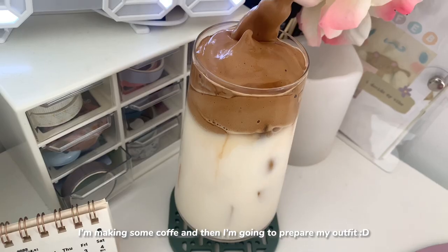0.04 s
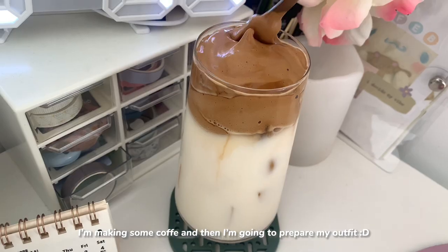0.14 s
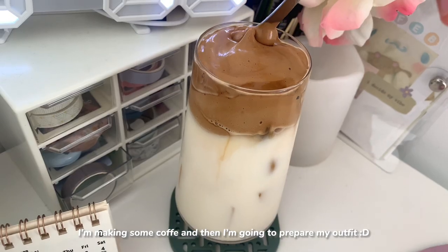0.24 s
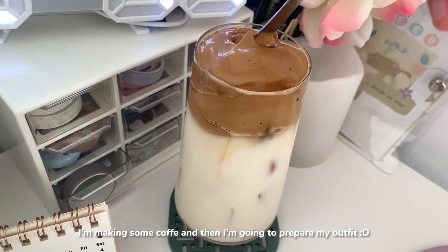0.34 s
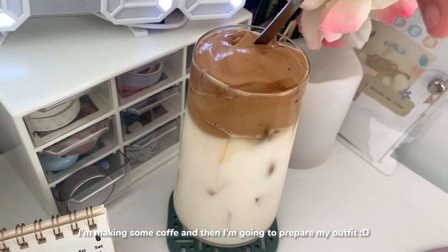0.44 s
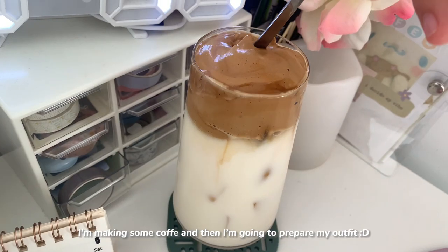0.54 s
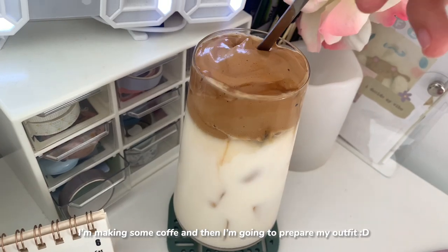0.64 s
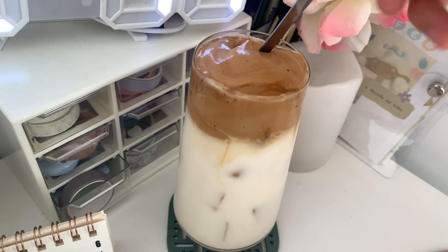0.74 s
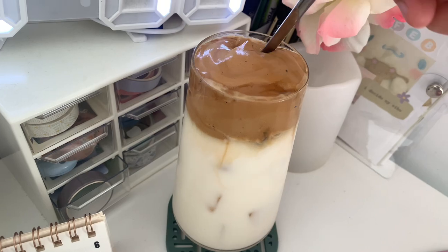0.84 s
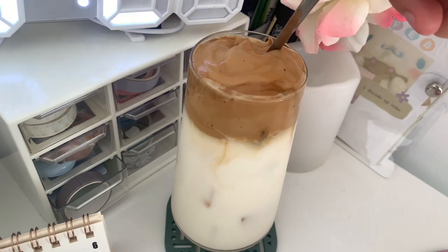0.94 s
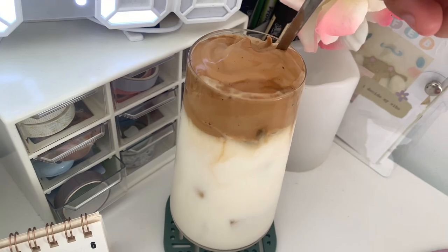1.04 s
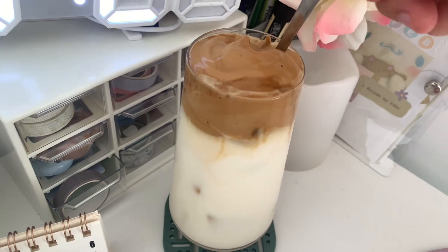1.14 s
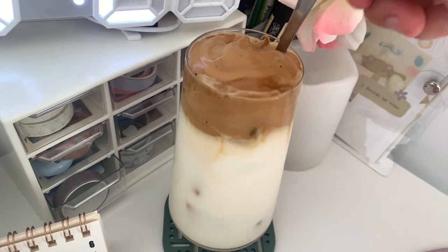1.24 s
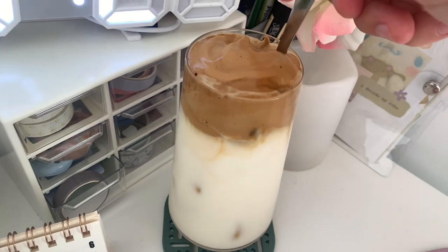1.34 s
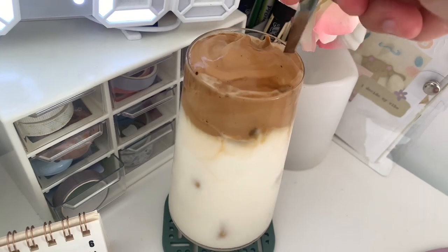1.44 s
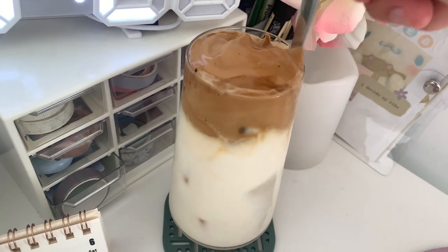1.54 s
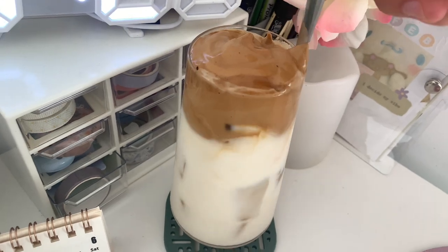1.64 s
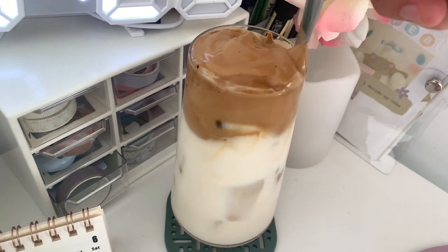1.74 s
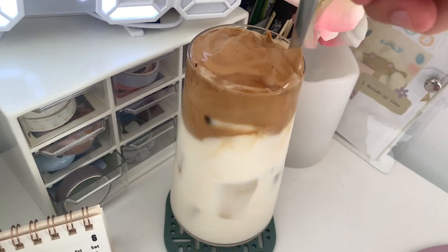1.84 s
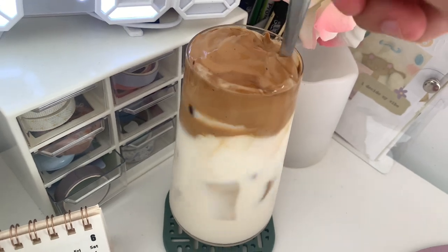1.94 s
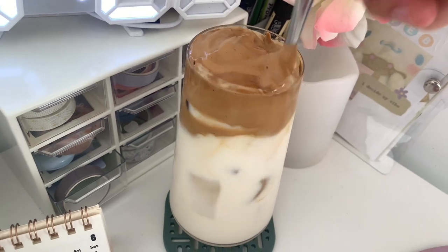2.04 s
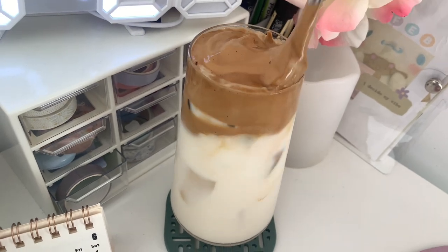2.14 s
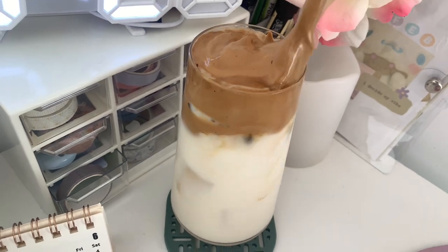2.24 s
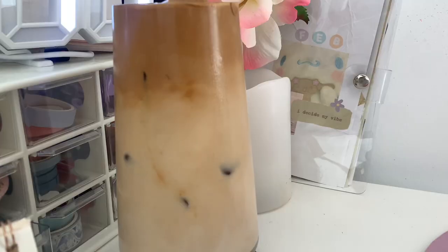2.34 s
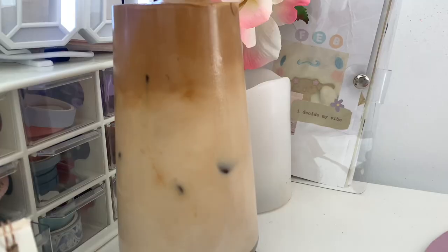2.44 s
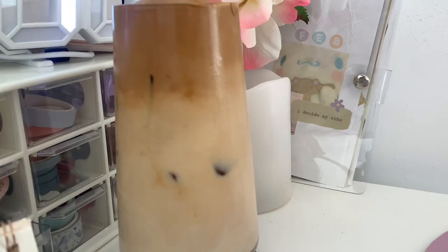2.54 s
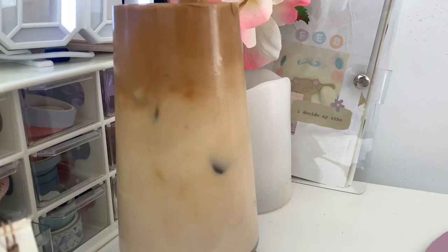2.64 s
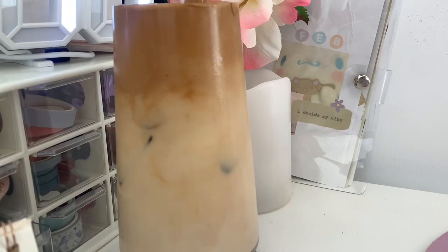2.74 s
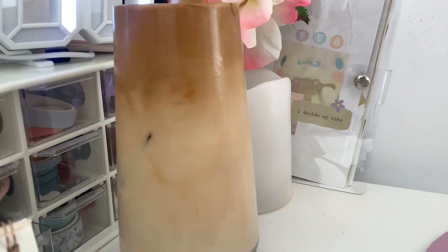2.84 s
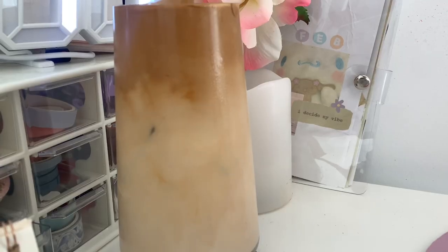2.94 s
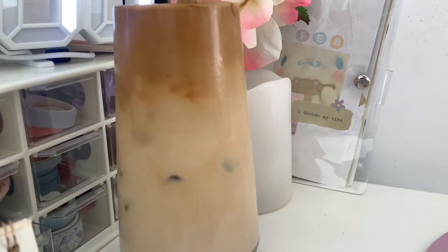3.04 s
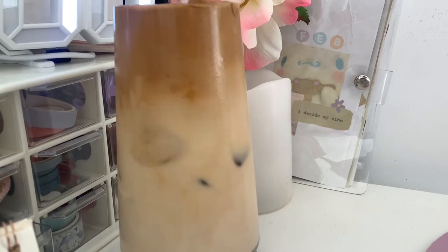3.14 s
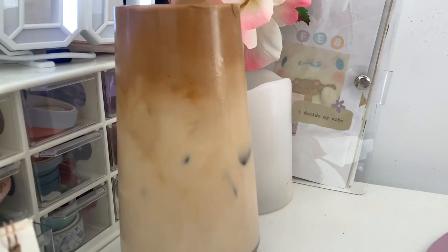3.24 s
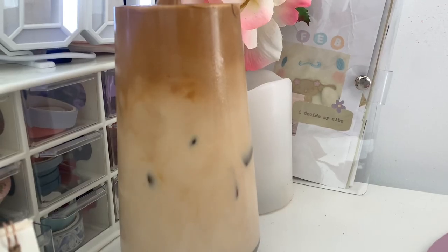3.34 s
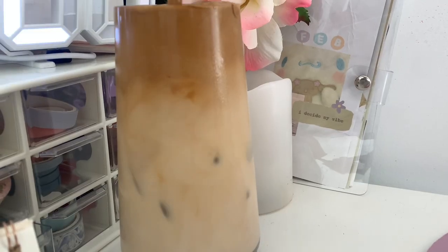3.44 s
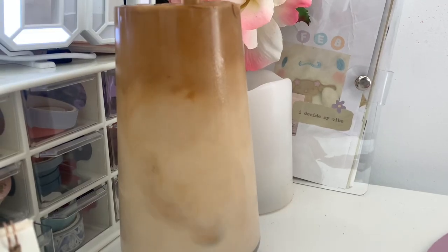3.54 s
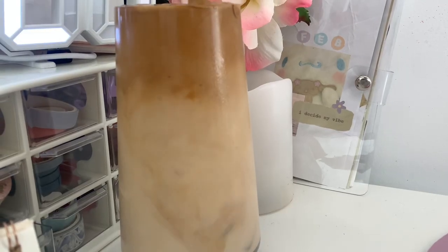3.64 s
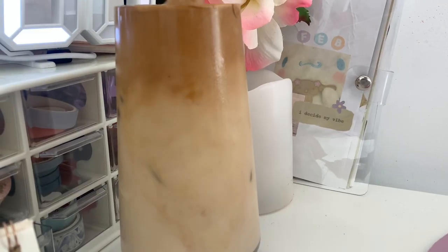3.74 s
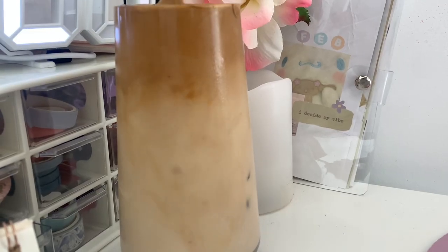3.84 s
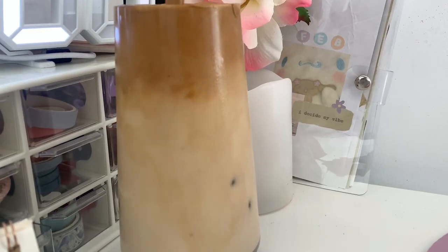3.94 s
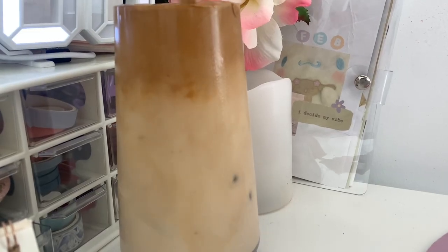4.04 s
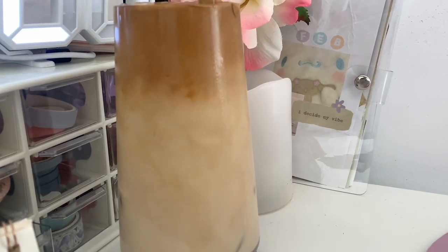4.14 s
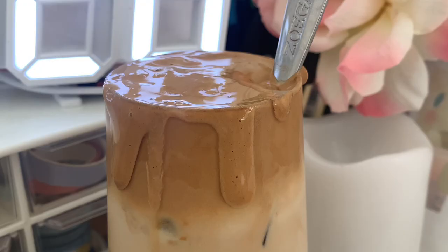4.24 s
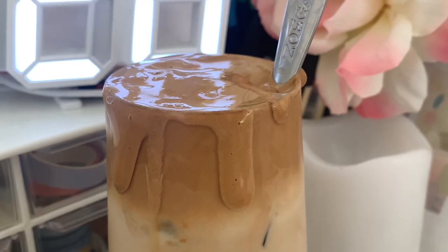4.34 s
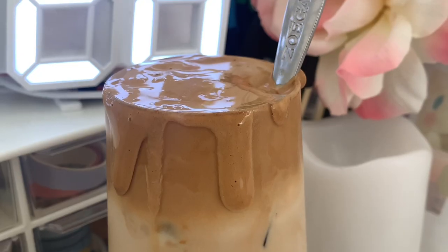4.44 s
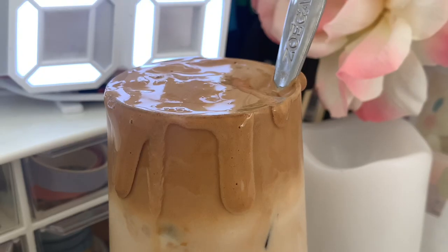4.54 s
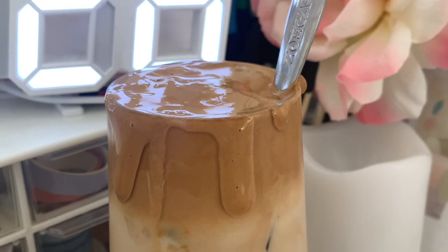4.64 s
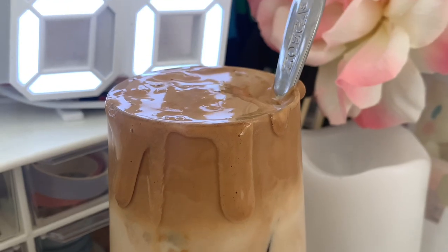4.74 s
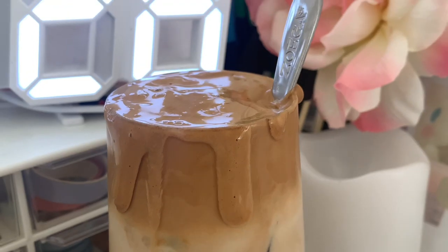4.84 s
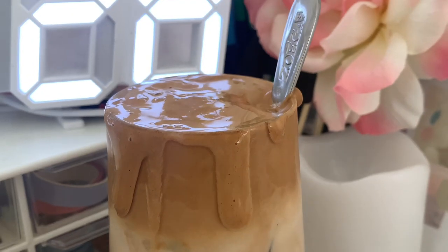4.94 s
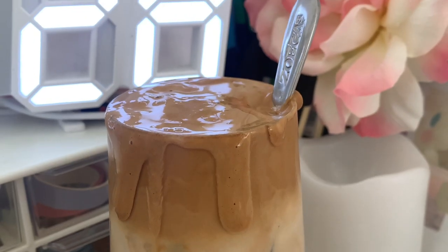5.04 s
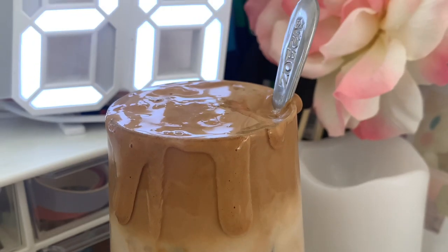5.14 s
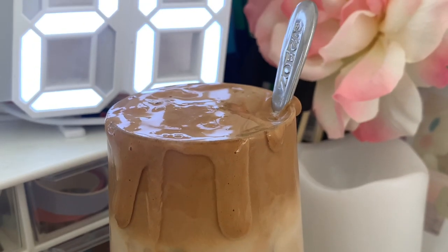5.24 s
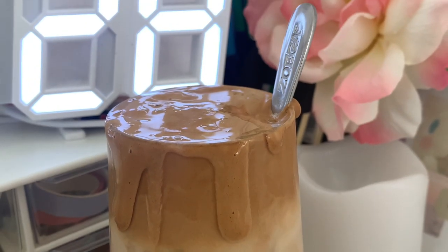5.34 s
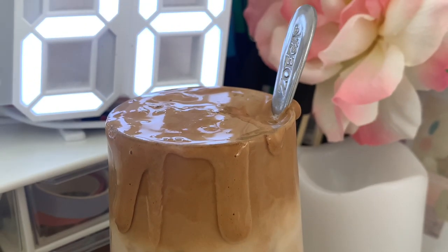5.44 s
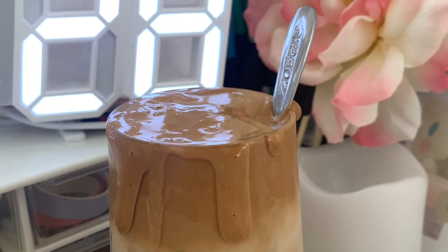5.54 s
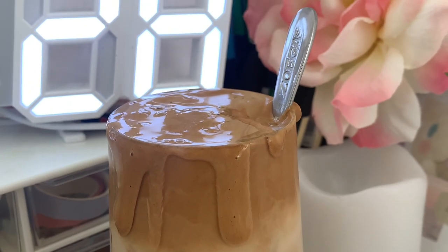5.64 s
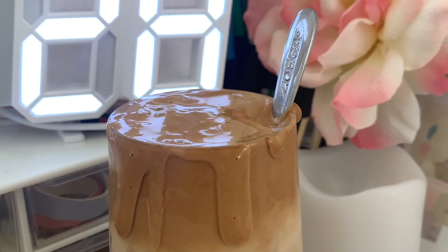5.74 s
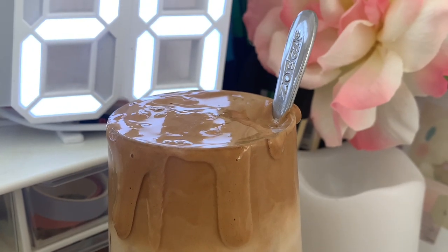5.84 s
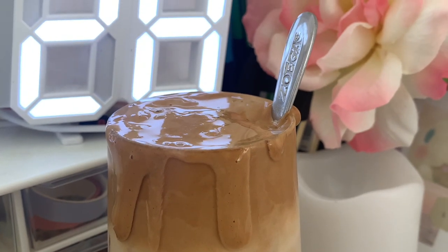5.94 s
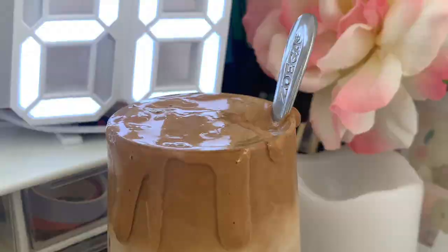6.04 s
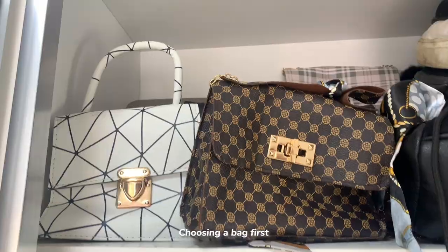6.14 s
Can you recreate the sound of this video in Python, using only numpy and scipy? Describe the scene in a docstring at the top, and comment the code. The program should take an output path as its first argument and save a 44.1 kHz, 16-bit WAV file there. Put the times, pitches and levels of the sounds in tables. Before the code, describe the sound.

A spoon stirs iced coffee in a tall glass, clinking and rattling with the ice, then two dull bumps on a desk.

```python
"""A spoon clinks and rattles round a tall glass of milky iced coffee, then two dull bumps follow.
Spoon and ice knock the glass, and the thick drink stops its ringing fast. Each knock also thumps
through the desk to a phone leaning on it, while ice and drink rub and fizz along the glass wall.
Low hums, a whine, rumble and faint hiss lie below. Twice the sound drops to silence for a moment."""
import sys
import numpy as np
from scipy import signal
from scipy.fft import rfft, irfft
from scipy.io import wavfile
from scipy.ndimage import uniform_filter1d

SR = 44100
rng = np.random.default_rng(int(sys.argv[2]) if len(sys.argv) > 2 else 0)


def generate_wav(sig):
    """Save sig (samples, or channels by samples) to the path in sys.argv[1] as 16-bit PCM at SR."""
    pcm = np.round(np.clip(np.atleast_2d(sig).T, -1, 1) * 32767).astype(np.int16)
    wavfile.write(sys.argv[1], SR, pcm)


N = 272229
T = np.arange(N) / SR

# Spoon and ice hitting the glass:
# start_s, clink_db, tick_db, body_db, desk_db, clink_pitch_hz, body_pitch_hz
GLASS_KNOCKS = [(0.42, -60.5, -83, -61, -65, 3380.0, 530.0), (0.446, -51, -49, -63, -52.5, 2900.0, 590.0),
                (0.456, -72, -63, -55, -49.5, 1940.0, 500), (0.53, -57.5, -77, -67, -65.0, 2620.0, 1410.0),
                (0.614, -65, -57, -61, -68, 3210.0, 500.0), (0.633, -65, -56.5, -64, -62, 2490.0, 560.0),
                (0.65, -66, -57, -66, -67, 4830.0, 670.0), (0.662, -58, -56, -53.5, -53, 3170, 500.0),
                (0.679, -69, -61, -50, -46.5, 4920.0, 515), (0.707, -53.5, -53.5, -59, -52, 4560, 520.0),
                (0.762, -60, -83, -62, -63, 3440, 780.0), (0.82, -65, -64, -75, -80, 4740.0, 500),
                (0.84, -61, -58, -78, -72, 1910.0, 580.0), (0.922, -52.5, -59.5, -71, -74, 4530, 1370.0),
                (0.999, -52, -67, -59, -61.0, 4360.0, 500), (1.024, -42, -41.5, -40, -40.5, 2040, 490),
                (1.176, -41.5, -55, -45.5, -47.5, 4486, 500), (1.222, -47.5, -72, -53, -59, 1980.0, 610.0),
                (1.279, -46.5, -45.5, -46, -40.5, 4530, 500), (1.299, -48, -50, -39.5, -37.5, 1980, 504),
                (1.34, -44.5, -44, -44, -47, 3330, 500), (1.381, -49, -46, -43.5, -46.5, 2000.0, 496),
                (1.422, -55, -58, -57, -51, 3640, 500), (1.433, -34, -39.5, -52, -43.5, 3660, 500),
                (1.448, -57, -66, -51, -60, 3130.0, 500), (1.472, -57, -52, -48.5, -63, 3170.0, 500),
                (1.483, -44, -46, -50, -67, 3520.0, 500), (1.51, -50, -50, -46, -53, 2940.0, 500),
                (1.521, -35, -50, -46.5, -45.5, 3470, 500), (1.62, -39.5, -45, -52, -62, 2947, 500),
                (1.736, -60, -82, -67, -54.5, 2850, 500), (1.792, -63.5, -61, -56.5, -65, 4590.0, 500),
                (1.878, -60.5, -48.5, -50.5, -54, 4735, 500), (1.892, -50, -59, -55, -63, 3350.0, 500),
                (1.918, -36, -42, -48, -55, 3000, 500), (1.952, -48.5, -60, -47, -53.5, 1915, 670.0),
                (2.026, -49, -74, -45.5, -66, 4470, 498), (2.064, -59.5, -86, -64, -72, 2193, 500),
                (2.095, -57, -86, -59, -70.0, 2840, 500), (2.128, -57.5, -68, -62, -52, 3340.0, 500),
                (2.143, -57, -81, -49.5, -50, 1920, 660.0), (2.204, -51.5, -84, -50, -56, 2900, 500),
                (2.264, -49.5, -70, -48, -76, 2710.0, 492), (2.343, -36.5, -62, -42.5, -43, 2330, 500.0),
                (2.369, -34, -42.5, -40, -53, 3530, 500.0), (2.404, -44.5, -51, -49, -56, 3290.0, 1130.0),
                (2.569, -29.5, -32.5, -39, -70, 3070.0, 506),
                (2.623, -26, -30.5, -35.5, -34.5, 4070.0, 920.0),
                (2.632, -32.5, -49, -37, -61, 2790.0, 520.0), (2.663, -46.5, -45, -33.5, -45, 2833, 1510.0),
                (2.676, -43, -45, -33.5, -36.5, 4030.0, 500), (2.683, -25.5, -44, -33, -33, 4150, 500),
                (2.693, -35, -40, -31, -42, 3062, 660.0), (2.731, -30.5, -36.5, -42, -41, 4460, 1590.0),
                (2.756, -60.5, -52.5, -42, -57, 3120.0, 500), (2.835, -68, -69, -44.5, -49, 2970.0, 494),
                (2.913, -49, -67, -43, -59.0, 2650, 1120.0), (3.013, -40, -49.5, -43, -61, 2937, 1140.0),
                (3.052, -26, -47.5, -27.5, -39, 2920, 500.0), (3.059, -34, -32, -33, -39, 2800.0, 500.0),
                (3.076, -37, -39.5, -39.5, -43, 4454, 520.0), (3.107, -29, -50.5, -31.5, -45, 3010, 1570.0),
                (3.124, -54.5, -61.5, -43, -54.5, 3965, 730.0),
                (3.225, -48, -55.5, -48.5, -67, 4080.0, 1140.0), (3.262, -42, -46, -39, -65, 3806, 1150.0),
                (3.321, -52, -61, -50, -63, 2926, 1160.0), (3.34, -25.5, -29, -36.5, -53, 3590, 494),
                (3.375, -24, -33.5, -26.5, -38.0, 3750, 500.0),
                (3.396, -50, -45, -34.5, -49.5, 4060.0, 940.0),
                (3.41, -24, -27.5, -25.5, -45.5, 4520, 930.0), (3.416, -25, -45.5, -29.5, -61, 3680.0, 500),
                (3.428, -30, -34.5, -31, -50.0, 2790, 1040.0),
                (3.438, -33.5, -32, -30, -48, 4070.0, 1120.0),
                (3.451, -36.5, -39, -27, -52.5, 4150, 1150.0), (3.476, -45, -51, -36.5, -47.0, 4106, 510.0),
                (3.487, -40.5, -48, -38, -56.5, 4000, 1140.0),
                (3.532, -30.5, -42, -35.5, -56.0, 2960, 500.0),
                (3.553, -37, -36.5, -44.5, -61, 3840, 550.0), (3.562, -42.5, -39, -33, -64, 3690.0, 1130.0),
                (3.572, -42.5, -43, -35, -56.5, 3760.0, 1450.0),
                (3.646, -37.5, -63, -35.5, -62, 2907, 1520.0), (3.721, -39.5, -37, -52, -70, 3850, 500),
                (3.744, -34.5, -43.5, -40, -57.5, 2900, 1180.0), (3.766, -44, -59, -32, -50.5, 2970, 500),
                (3.776, -32, -40.5, -34, -46, 2840, 520.0), (3.792, -47, -51.5, -34.5, -47, 1910.0, 520.0),
                (3.821, -34, -46.5, -38, -46, 2920.0, 710.0),
                (3.847, -44.5, -54, -45.5, -63, 3630.0, 510.0),
                (3.856, -28, -30.5, -37.5, -58.5, 4450, 500), (3.884, -38.5, -39.5, -39, -56, 3010, 520.0),
                (3.923, -53.5, -57, -48, -65, 3070, 1220.0),
                (3.938, -38.5, -43, -33.5, -49.5, 1990.0, 500.0),
                (3.956, -33, -37.5, -27.5, -58, 5170.0, 1430.0),
                (3.964, -38, -40, -37.5, -54.0, 4360, 520.0), (3.974, -40.5, -50, -32, -44.5, 3130, 510.0),
                (3.986, -36.5, -42, -31.5, -47, 1903, 530.0), (4.008, -44.5, -53.5, -37, -62, 1917, 540.0),
                (4.048, -40.5, -55.5, -39, -63.5, 2010.0, 496.4),
                (4.104, -46, -57, -42.5, -55, 1960, 500.0), (4.122, -23, -19.5, -34, -60, 3990, 510.0),
                (4.135, -46, -44, -36, -57.5, 4110, 500.0),
                (4.156, -45, -51.5, -38.5, -66.5, 3750.0, 540.0),
                (4.223, -52, -54, -49.5, -67.0, 3100, 500)]
# A mode is one pitch at which a thing rings; ring_s is the time it takes to fade by 60 dB.
# Modes of the full glass (low body, bright clink, very high tick): pitch_hz, relative_db, ring_s
BODY_MODES = [(500, 3, .065), (640, -10, .018), (760, -7, .018), (940, 2, .022), (1150, 3, .026),
              (1460, -1, .02), (1650, -9, .012)]
CLINK_MODES = [(2100, -6, .008), (2430, -3, .008), (2950, -2, .008), (3400, -3, .007), (3850, 0, .007),
               (4500, 3, .007), (5000, 2, .006), (5600, -1, .005)]
TICK_MODES = [(6300, -5, .005), (7300, -1, .005), (8200, -6, .004), (10100, 1, .005), (11000, -6, .004),
              (13000, 2, .005), (14000, -4, .004), (15600, -24, .005)]
# Modes of the desk top: pitch_hz, relative_db, ring_s
DESK_MODES = [(97.5, -7, 0.1), (119.2, 6.5, 0.18), (141, -6.5, 0.11), (178.8, 1, 0.36), (202.7, -3, 0.25),
              (235, -7.5, 0.097), (310.4, -4.5, 0.12), (422, -10, 0.035)]
# Drink and ice washing round the glass: time_s, rub_db, fizz_db
WASH_LEVELS = [(0.0, -79, -91), (0.4, -70.5, -81.5), (0.59, -70.5, -74.5), (1.04, -68.5, -82),
               (1.4, -59, -67), (1.61, -67.5, -78.5), (2.09, -65.5, -80.5), (2.46, -66, -86),
               (2.8, -57.5, -82.5), (3.03, -64, -75.5), (3.18, -58, -75.5), (3.35, -54.5, -68),
               (3.46, -46, -65), (3.79, -57, -68), (3.96, -44.5, -60.5), (4.08, -47.5, -65),
               (4.2, -63, -75.5), (4.25, -60, -73)]
# Tone colour (how strong each pitch is) of the rubbing and the fizz: pitch_hz, relative_db
RUB_COLOUR = [(300, -28), (500, 5), (900, -1.5), (1500, -3), (1900, -6), (3000, -16), (4500, -29),
              (5500, -34), (8000, -61.5)]
FIZZING_COLOUR = [(2350, -32), (4000, -11), (6390, -12.5), (6700, -13), (8000, -5), (10800, -3.5),
                  (11800, -15.5), (13600, 1), (15800, -35.5), (16500, -53.5)]
# Dull bumps on the desk: start_s, peak_db, top_hz, bottom_hz, panel_relative_db, boom_relative_db
DESK_BUMPS = [(5.081, -46.5, 530, 205, -12.5, -14.5), (5.924, -35.5, 354, 60.3, -23, -0.5)]
# A motor in the house, humming at 2 and 3 times its speed: time_s, turns_per_s, double_db, triple_db
MOTOR_HUM = [(0, 29, -42, -52), (.8, 29.1, -43.5, -48), (.9, 27.3, -63, -47.5), (1.1, 28.7, -52, -43.5),
             (2.05, 27.2, -54, -42.5), (2.2, 28.8, -45, -49), (2.9, 29.2, -43, -49), (3.6, 29.3, -43, -50),
             (4.25, 29.4, -42.5, -50.5)]
# A low hum after the stirring ends: time_s, pitch_hz, level_db
CLOSING_HUM = [(4.3, 65.76, -48.5), (4.8, 65.6, -52.5), (5.15, 67, -48.5), (5.5, 66.5, -53),
               (5.7, 67.82, -56.5), (6.1, 65.3, -55)]
# A faint whine that swells twice: time_s, pitch_hz, level_db
FAINT_WHINE = [(1.5, 415, -64.5), (1.84, 418, -59.5), (1.9, 421.3, -72), (2.04, 418, -54), (2.3, 418, -70)]
# Tone colour of the low rumble, before its swell: pitch_hz, level_db_per_hz
RUMBLE_COLOUR = [(20, -96.5), (45, -65.5), (100, -74), (130, -71), (200, -83.5), (300, -92), (500, -100),
                 (1000, -120), (3000, -150)]
# Tone colour of a faint hiss with two shallow treble dips: pitch_hz, level_db_per_hz
HISS_COLOUR = [(300, -126), (700, -112), (1200, -114), (2500, -119), (5000, -124), (8500, -126),
               (10300, -122), (11800, -128), (13300, -122), (14300, -125), (14800, -150), (17000, -165)]
# The slow swell of the rumble: time_s, gain_db
RUMBLE_GAIN = [(0, -12), (2.3, -6), (4.25, -5), (4.3, -8.5), (6.1, -5)]
# Stretches with sound, silent in between: start_s, end_s
HEARD_SPANS = [(0, 2.2995), (2.3205, 4.251), (4.2985, 6.099)]

CONTACT_S, CONTACT_SPREAD = .0011, .25  # how long a knock touches the glass, and how much that varies
BOOM_HZ, BOOM_WIDTH_HZ = 62.4, 28
LEFT_LAG_SAMPLES, LEFT_LOUDER_DB = 13, 1.0
ECHO_DB, ECHO_FADE_S = -3, .002
ROOM_DB, ROOM_RING_S, ROOM_TOP_HZ = -17, .21, 5000


def knocks():
    """Each knock rings the glass (clink, tick and low body) and thumps the desk under it."""
    _, clink_db, tick_db, body_db, desk_db, clink_hz, body_hz = np.transpose(GLASS_KNOCKS)
    contact_s = CONTACT_S * np.exp(CONTACT_SPREAD * rng.standard_normal(len(GLASS_KNOCKS)))
    clink = ring(CLINK_MODES, clink_db, contact_s, scatter_db=.83, detune=.04, size=1400, window=128,
                 favoured_hz=clink_hz)
    tick = ring(TICK_MODES, tick_db, contact_s, scatter_db=3.7, detune=.04, size=1400, window=128)
    body = ring(BODY_MODES, body_db, contact_s, scatter_db=2.5, detune=.02, size=4000, window=160,
                favoured_hz=body_hz, max_cut_db=13)
    thump = ring(DESK_MODES, desk_db, contact_s, scatter_db=1.1, detune=.03, size=10000, window=1800)
    return clink + tick, body, thump


def ring(modes, levels_db, contact_s, scatter_db, detune, size, window, favoured_hz=None, max_cut_db=9):
    """Every knock is a tiny scrape that sets the modes ringing; size and window count samples."""
    hz, db, ring_s = (np.array(column)[None, :, None] for column in zip(*modes))
    t = np.arange(size) / SR
    chance = rng.standard_normal((len(GLASS_KNOCKS), len(modes), 2))
    swing = np.sin(2 * np.pi * hz * (1 + detune * chance[..., :1]) * t)
    if favoured_hz is not None:
        # the spot that is hit favours the modes near one pitch
        octaves_away = np.abs(np.log2(hz / favoured_hz[:, None, None]))
        db = db - np.minimum(14 * octaves_away, max_cut_db)
    # a mode that dies faster starts stronger, so db is its share of the energy
    strength = undb(db + scatter_db * chance[..., 1:]) / np.sqrt(ring_s)
    rings = (strength * swing * np.exp(-np.log(1000) * t / ring_s)).sum(axis=1)
    touch = t[:600] / np.clip(contact_s, .0002, .003)[:, None]
    scrape = rng.standard_normal((len(GLASS_KNOCKS), 600)) * np.sqrt(touch) * np.exp(-touch)
    scrape = flatten_colour(scrape) * np.exp(-touch / 3)
    rings = signal.fftconvolve(rings, scrape, axes=1)[:, :size]
    # bring the loudest window of each knock to its level
    loudest = uniform_filter1d(rings ** 2, size=window, axis=1, mode="constant").max(axis=1)
    rings *= (undb(levels_db) / np.sqrt(loudest))[:, None]
    out = np.zeros(N + size)
    for knock, sound in zip(GLASS_KNOCKS, rings):
        start = int(knock[0] * SR)
        out[start:start + size] += sound
    return out[:N]


def wash(grains_per_s=1200, thud_above_rub_db=3.5):
    """Ice and drink rub the wall in many tiny grains of sound, and thud dully through the desk."""
    hits = rng.random(N) < grains_per_s / SR
    grains = hits * rng.standard_normal(N) * undb(np.minimum(3.8 * rng.exponential(size=N), 18))
    smear = rng.standard_normal(200) * np.exp(-np.arange(200) / SR / .0016)
    grains = signal.fftconvolve(grains, smear)[:N]
    grains = grains / grains.std() + .5 * rng.standard_normal(N)
    thud = sum(undb(db) * band(rng.standard_normal(N), hz * .95, hz * 1.05) for hz, db, _ in DESK_MODES)
    thud = thud / thud.std() * undb(curve(WASH_LEVELS) + thud_above_rub_db)
    rub = coloured(grains, RUB_COLOUR)
    rub = rub / rub.std() * undb(curve(WASH_LEVELS))
    fizz = coloured(grains, FIZZING_COLOUR) * undb(12 * wander(40))  # it comes in bursts
    fizz = fizz / fizz.std() * undb(curve(WASH_LEVELS, column=2))
    stirring = T < WASH_LEVELS[-1][0]
    return stirring * (rub + fizz), stirring * thud


def bumps():
    """Soft blows on the desk: a small panel of it rings briefly and the whole top booms."""
    out = np.zeros(N)
    for start_s, peak_db, top_hz, bottom_hz, panel_db, boom_db in DESK_BUMPS:
        blow = np.zeros(N)
        blow[int(start_s * SR)] = 1
        thud = band(band(blow, bottom_hz, top_hz), bottom_hz / 2, 2 * top_hz)
        panel = band(blow, 508, 572)
        boom = band(blow, BOOM_HZ - BOOM_WIDTH_HZ / 2, BOOM_HZ + BOOM_WIDTH_HZ / 2)
        bump = at_peak(thud, 0) + at_peak(boom, boom_db) + at_peak(panel, panel_db)
        out += at_peak(through_desk(bump, lag_at_1khz_s=.00161), peak_db)
    return out


def through_desk(x, lag_at_1khz_s=.001604):
    """Sound crosses the desk as bending waves: the lower the pitch, the later it arrives."""
    hz = np.fft.rfftfreq(N, 1 / SR)
    lag_s = lag_at_1khz_s * (np.maximum(hz, 30) / 1000) ** -.78
    return irfft(rfft(x) * np.exp(-2j * np.pi * np.cumsum(lag_s) * hz[1]), N)


def through_air(air):
    """Sound reaches the nearer, right microphone first; desk and shelves add quick echoes to each side."""
    t = np.arange(400) / SR
    path = rng.standard_normal((2, 400)) * np.exp(-t / ECHO_FADE_S) * (t > .0004)
    path *= undb(ECHO_DB) / np.sqrt((path ** 2).sum(axis=1, keepdims=True))
    path[:, 0] = 1  # the direct sound
    path = flatten_colour(path) * np.exp(-t / ECHO_FADE_S / 2)
    left = np.roll(air, LEFT_LAG_SAMPLES) * undb(LEFT_LOUDER_DB / 2)
    right = air * undb(-LEFT_LOUDER_DB / 2)
    return signal.fftconvolve(np.array([left, right]), path, axes=1)[:, :N]


def room(air):
    """A small furnished room adds a short, dull tail of echoes, different left and right."""
    t = np.arange(16000) / SR
    fade = np.exp(-np.log(1000) * t / ROOM_RING_S / 2)  # half the fade, used twice
    echoes = flatten_colour(rng.standard_normal((2, len(t))) * fade)
    tail = band(echoes * fade, 400, ROOM_TOP_HZ)
    tail *= (1 - np.exp(-t / .00033)) / np.sqrt((tail ** 2).sum(axis=1, keepdims=True))
    return signal.fftconvolve(air[None], tail, axes=1)[:, :N]


def hum(table, waver_db, multiple=1, column=2):
    """A tone of wavering loudness at a multiple of the table's pitch, heard only during its times."""
    on = (T >= table[0][0]) & (T <= table[-1][0])
    level = undb(curve(table, column) + waver_db * wander(22))
    phase = 2 * np.pi * multiple * np.cumsum(curve(table)) / SR
    return on * level * np.sqrt(2) * np.sin(phase)


def background():
    """Hums, whine and rumble are nearly alike on both sides; the hiss differs left and right."""
    motor = hum(MOTOR_HUM, 2.5, multiple=2) + hum(MOTOR_HUM, 2.5, multiple=3, column=3)
    low_hum = hum(CLOSING_HUM, 5)
    whine = hum(FAINT_WHINE, 5) + undb(-16.5) * hum(FAINT_WHINE, 2, multiple=2)
    low_noise = coloured(rng.standard_normal((2, N)), RUMBLE_COLOUR)
    rumble, side_rumble = low_noise * undb(curve(RUMBLE_GAIN) + 4.5 * wander(3))
    width = undb(-22) * side_rumble * np.array([[1], [-1]])  # opposite left and right
    hiss = coloured(rng.standard_normal((2, N)), HISS_COLOUR)
    return motor + low_hum + rumble + width + whine + hiss


def undb(db):
    """Turn decibels into a number to multiply by."""
    return 10 ** (np.asarray(db) / 20)


def at_peak(x, db):
    """Scale a sound so that its peak is at db."""
    return x * undb(db) / np.abs(x).max()


def curve(table, column=1):
    """Join a column's values with straight lines over time."""
    rows = np.array(table)
    return np.interp(T, rows[:, 0], rows[:, column])


def wander(steps_per_s):
    """A smooth random wobble around zero."""
    hold = int(SR / steps_per_s)
    steps = np.repeat(rng.standard_normal(N // hold + 1), hold)
    return .51 * uniform_filter1d(uniform_filter1d(steps, hold), hold)[:N]


def band(x, low_hz, high_hz):
    """Keep the pitches between low_hz and high_hz."""
    edges_hz = [low_hz, min(high_hz, .45 * SR)]
    return signal.sosfilt(signal.butter(2, edges_hz, "band", fs=SR, output="sos"), x)


def coloured(noise, colour):
    """Give noise the tone colour in a table."""
    table_hz, table_db = np.transpose(colour)
    hz = np.maximum(np.fft.rfftfreq(N, 1 / SR), 1)
    gain = undb(np.interp(np.log(hz), np.log(table_hz), table_db))
    return irfft(rfft(noise) * gain * np.sqrt(SR / 2), N)


def flatten_colour(x):
    """Make all pitches equally strong while keeping roughly the same timing."""
    spectrum = rfft(x)
    return irfft(spectrum / np.abs(spectrum), x.shape[-1])


def scene():
    """The stirring reaches the phone through both air and desk, over the background."""
    clink, body, thump = knocks()
    swish, thud = wash()
    air = clink + undb(.5) * body + swish
    desk = through_desk(thump + undb(-5.5) * body) + thud
    shaking = desk * undb([[.3], [-.3]])  # the left end of the phone shakes a little more
    return through_air(air) + undb(ROOM_DB) * room(air) + shaking + bumps() + background()


def record(dry):
    """The microphones lose the deepest bass and highest treble; silence falls twice and at the end."""
    heard = signal.sosfilt(signal.butter(3, 32, "high", fs=SR, output="sos"), dry)
    heard = signal.sosfilt(signal.butter(3, 14800, "low", fs=SR, output="sos"), heard)
    sound_on = sum((T >= start_s) & (T < end_s) for start_s, end_s in HEARD_SPANS)
    steep_top_cut = signal.ellip(8, .2, 70, 16300, fs=SR, output="sos")
    return signal.sosfilt(steep_top_cut, heard * sound_on)


dry = scene()
out = record(dry)
generate_wav(out)
```